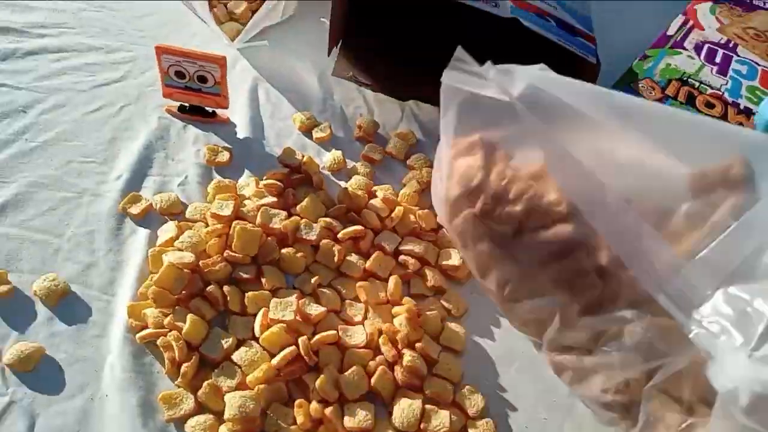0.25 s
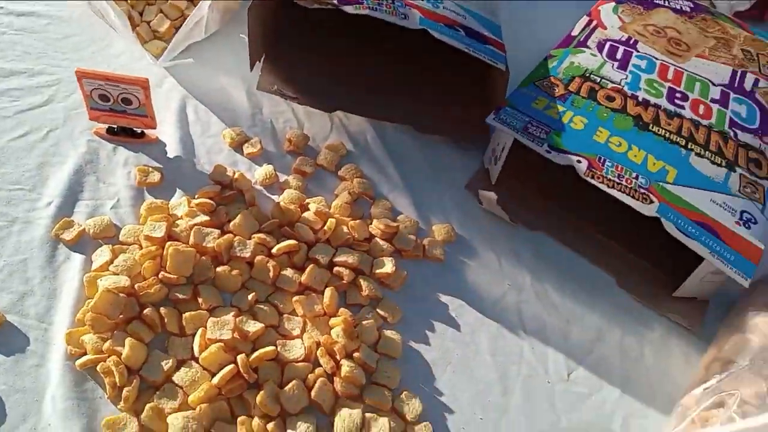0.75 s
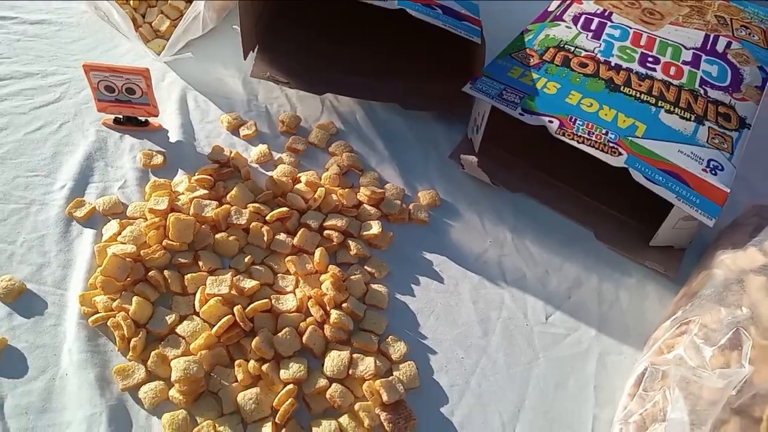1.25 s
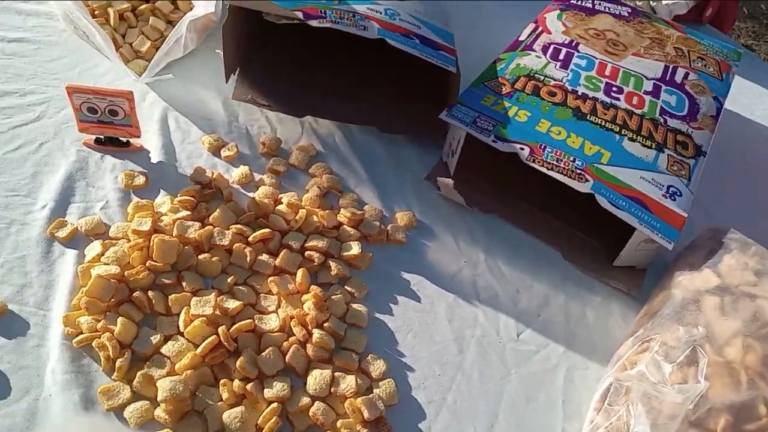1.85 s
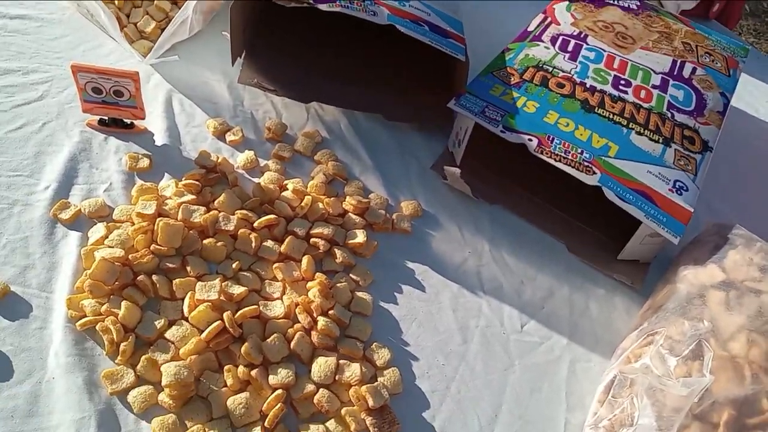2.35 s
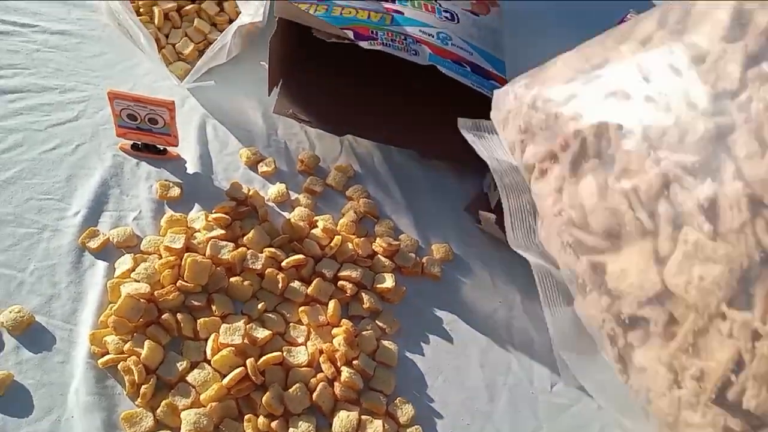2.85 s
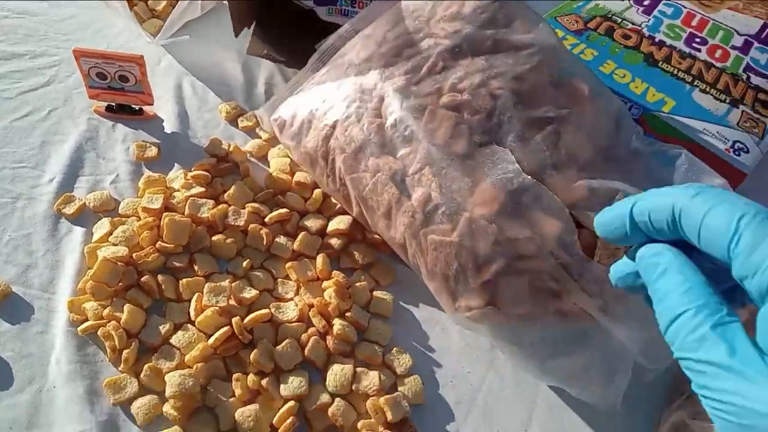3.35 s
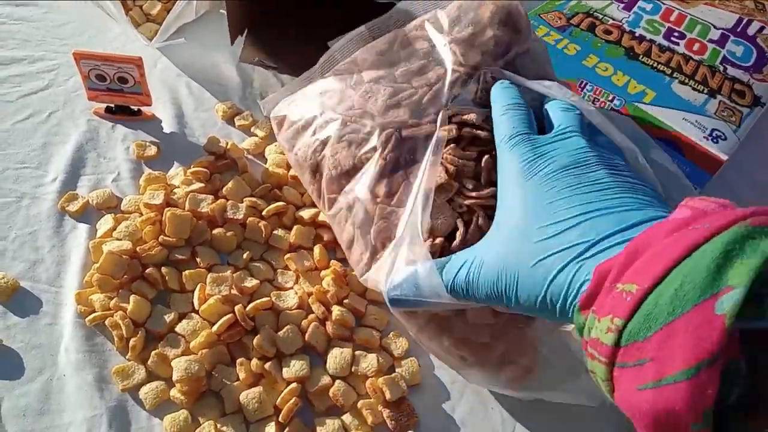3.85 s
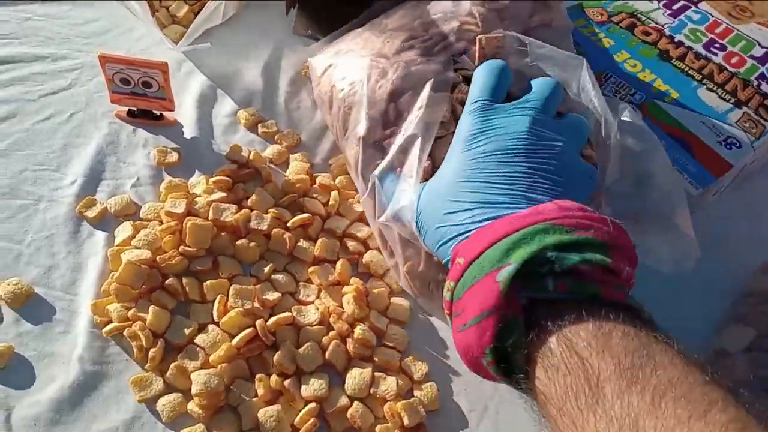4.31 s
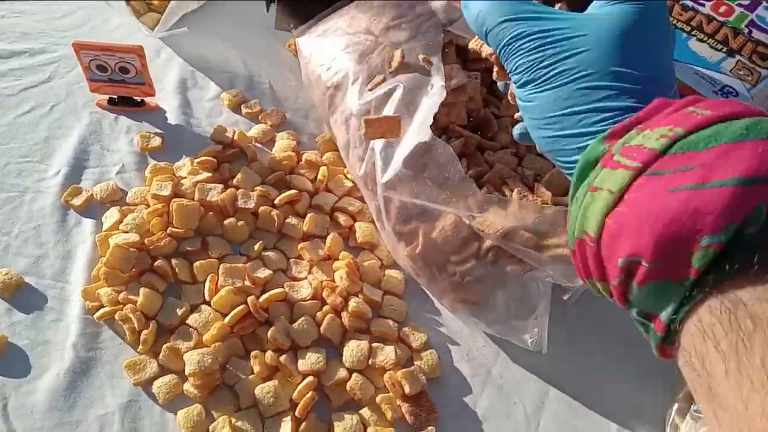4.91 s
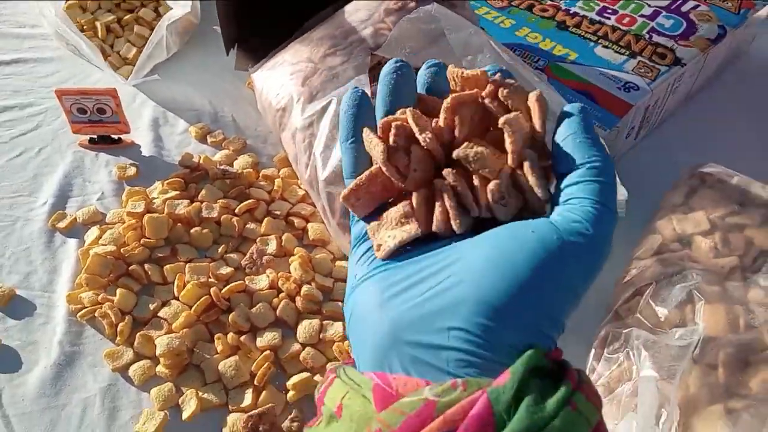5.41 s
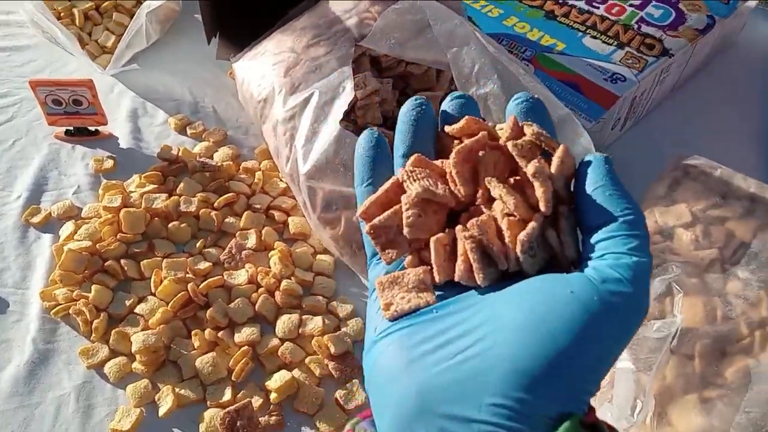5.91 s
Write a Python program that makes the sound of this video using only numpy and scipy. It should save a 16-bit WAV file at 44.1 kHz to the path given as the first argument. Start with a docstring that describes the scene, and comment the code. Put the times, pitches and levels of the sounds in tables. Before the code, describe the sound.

A stiff film bag is handled outdoors, right beside two differing microphones: strong crinkles, bright pops, soft thuds of settling cereal and a few low bumps. After a thick rustle as it lands, short scrapes and gritty rattling mark a hand digging inside. One quick cardboard knock sounds as the handful comes out, and the noise thins to isolated clicks over quiet air and faint far engine hum. No echo; mostly left-sided, with a brittle right side.

```python
"""Dry film crackle and snaps as a hand drags a plastic cereal bag past two unlike microphones, outdoors.
It digs in and lifts out dry squares: random grain bursts give film, ticks and lumps; timed bursts give snaps.
Filtered noise makes slumps and scrapes, pressure pulses the bumps on the microphones, decaying sines a knock
on the carton. Behind lie shaped air noise, a far engine's wavering sines and a faint high tone.
Left microphone: farther from the sound, loud in the mids. Right: thin and bright."""
import sys
import numpy as np
from scipy import signal
from scipy.fft import rfft, irfft
from scipy.io import wavfile
from scipy.ndimage import uniform_filter1d

SR = 44100
rng = np.random.default_rng(int(sys.argv[2]) if len(sys.argv) > 2 else 0)


def unload_wav(signal):
    """Save mono or channel-first audio to the path in sys.argv[1] as 16-bit WAV at rate SR, clipped to [-1, 1]."""
    wavfile.write(
        sys.argv[1],
        SR,
        np.round(np.clip(np.atleast_2d(signal).T, -1, 1) * 32767).astype(np.int16),
    )


N = 272008

# outdoor air spectrum before the microphones: f/Hz, relative density/dB
AIR_SPECTRUM = [(30, -4), (80, 5.5), (280, 3.5), (480, -35), (700, -6), (1300, -24), (2500, -26.5),
                (5000, -44), (16000, -19)]
# air RMS level: left/dB, right/dB
AIR_RMS_DB = [-56, -62.5]
# low hum, fundamental before the side gains: t/s, level/dB
HUM_LEVEL = [(0, -54), (.51, -54.5), (.62, -42), (.84, -54), (.98, -46.5), (1.2, -53), (1.6, -77),
             (2.0, -72), (2.15, -48), (2.37, -51), (2.7, -106), (3.18, -62), (3.54, -58), (3.76, -56.5),
             (4.28, -62), (4.41, -66), (5.21, -63), (5.27, -47), (5.5, -41), (5.62, -40.5), (5.77, -38),
             (5.9, -42), (6.17, -41)]
# hum overtones before the side gains: f/Hz, base level/dB
HUM_OVERTONES = [(156, -60), (233, -57.5), (335, -64)]
# short stretches of the faint high tone: start/s, end/s
THIN_TONE_STRETCHES = [(5.41, 5.5), (5.55, 5.66), (5.72, 5.82)]
# left microphone response: f/Hz, gain/dB
LEFT_COLOUR = [(40, -56), (90, -17.5), (300, -16.5), (700, -15), (1300, -8), (1900, 3.5), (2700, 3.5),
               (3600, 0), (4400, -5), (5200, -10), (6200, -8.5), (7600, -14), (8500, -13.5), (9300, -24),
               (11000, -43.5), (12500, -46), (15400, -33.5), (15800, -43), (16200, -93.5)]
# right microphone response: f/Hz, gain/dB
RIGHT_COLOUR = [(40, -14.5), (90, -19), (300, -12), (1000, -14), (2500, -8), (6000, -10.5), (7700, -13),
                (9200, -2), (10300, -11), (12000, -20.5), (13800, -25.5), (14600, -12.5), (15600, -9.5),
                (16000, -24.5), (16600, -38)]
# piece rocking on the carton: t/s, left peak/dB
CARTON_CONTACTS = [(5.129, -22), (5.132, -7), (5.1343, -10.5), (5.1363, -12.5), (5.146, -25), (5.1535, -22),
                   (5.1625, -34)]
# modes of the hollow carton: f/Hz, relative level/dB, t60/s
CARTON_MODES = [(805, -10, 0.047), (882, -2.5, 0.022), (1280, 1.5, 0.019), (1766, 5, 0.021),
                (2280, -1.5, 0.016), (3065, -1.5, 0.013)]
# bag scraping over cloth: start/s, length/s, left level before fades/dB, first f/Hz, last f/Hz
CLOTH_SCRAPES = [(2.814, 0.18, -29.5, 1420, 1140), (3.622, 0.15, -37.5, 1320, 940),
                 (4.064, 0.154, -37, 1210, 890), (4.654, 0.075, -31, 1760, 1280)]
# slumps of the full bag: t/s, mean peak of both sides/dB, ring f/Hz, t60/s, left minus right/dB
BAG_SLUMPS = [(0.649, -36, 254, 0.15, 4), (0.7, -27, 730, 0.032, -7), (0.742, -20, 671, 0.024, 0),
              (1.211, -25, 250, 0.037, -7.5), (1.246, -23, 254, 0.096, -6), (1.267, -15.5, 293, 0.033, 4.5),
              (1.32, -15, 523, 0.01, 10.5), (1.334, -23.5, 770, 0.046, -1), (1.449, -24.5, 623, 0.021, 10),
              (2.06, -25, 795, 0.12, -3), (3.026, -29, 890, 0.084, 15), (3.048, -29.5, 280, 0.012, 12)]
# bag bumping the microphones, before the roll-off: t/s, left push/1, right push/1, decay time/ms
MIC_BUMPS = [(0.3893, 0, 2.5, 0.62), (2.156, 0, 0.7, 1.8), (2.1984, 1.8, 0.7, 1.05),
             (2.208, 0.7, -1.5, 0.53), (2.2194, 0.94, 0.4, 1.5), (2.229, 0.16, 0.3, 1.5),
             (2.2915, -2.5, 0.5, 0.33), (2.2922, -0.3, 0.3, 1.8), (2.345, -1.4, -0.8, 0.19),
             (2.365, 0.2, 0.2, 1.5)]
# single snaps and ticks: t/s, left peak/dB, right peak/dB, ring f/Hz, t60/s, top-band sheen/dB
FOLD_SNAPS = [(0.1208, -8, -15, 3150, 0.0075, 2), (0.1883, -16, -11.5, 2820, 0.004, 9),
              (0.2346, -6, -15.5, 3560, 0.0081, 0), (0.296, -6, -13.5, 2650, 0.0084, 1),
              (0.3077, -5.0, -17.5, 2580, 0.0094, -12), (0.4123, -29, -16, 2930, 0.0061, 22),
              (0.494, -10, -8.5, 2570, 0.0039, 9), (0.535, -17, -8, 2630, 0.012, 33),
              (0.562, -12, -19, 2230, 0.02, -3), (0.5844, -5, -20, 2600, 0.0031, 22),
              (0.661, -13, -21, 2580, 0.0053, -2), (0.794, -12, -30, 3770, 0.012, -6),
              (0.8119, -14, -16, 2460, 0.014, 1), (0.842, -9, -23, 2620, 0.0057, -20),
              (0.859, -10.5, -26, 4130, 0.013, -5), (0.8768, -10, -28, 2180, 0.0026, -5),
              (0.8854, -14, -28, 1920, 0.0039, 5), (0.8932, -8.5, -21, 3060, 0.0045, 5),
              (0.9266, -7.5, -15.5, 2770, 0.025, -4), (0.9574, -11, -33, 2220, 0.012, 0),
              (0.9973, -8.5, -27, 2620, 0.0064, -1), (1.005, -11, -21, 2820, 0.007, -7),
              (1.03, -23, -13.5, 1970, 0.012, 3), (1.0593, -12.5, -23, 2690, 0.0078, 1),
              (1.071, -10.5, -26, 2700, 0.0088, -22), (1.083, -11.5, -17.5, 2700, 0.0098, -2),
              (1.154, -16.5, -16, 2520, 0.0051, 6), (1.174, -17, -22, 2150, 0.008, 2),
              (1.269, -10, -24, 2640, 0.0061, -10), (1.322, -13, -24, 2780, 0.025, 0),
              (1.339, -8.5, -13, 2220, 0.0055, 9), (1.512, -15, -22, 2700, 0.008, 6),
              (1.5347, -16, -27, 2820, 0.008, 11), (1.5568, -11, -21, 3300, 0.0047, 5),
              (1.5718, -21, -19, 2690, 0.01, 12), (1.5912, -11.5, -33, 2630, 0.018, -14),
              (1.613, -13, -32, 2930, 0.0041, -5), (1.621, -9.5, -22, 2600, 0.014, -13),
              (1.6415, -11, -29, 2150, 0.0045, -15), (1.6932, -9.5, -21, 3320, 0.0059, -10),
              (1.7111, -6.5, -25, 2600, 0.0063, -15), (1.7197, -13, -15.5, 1870, 0.0063, -11),
              (1.755, -24, -25, 1920, 0.0056, 5), (1.765, -10, -24, 3310, 0.0069, 14),
              (1.777, -14.5, -26, 2800, 0.0056, -4), (1.8208, -13, -21.5, 2560, 0.0025, 0),
              (1.8468, -15, -22, 2520, 0.0046, 4), (1.8795, -18.5, -36, 1900, 0.0054, -7),
              (1.9262, -10.5, -17.5, 2610, 0.0086, 15), (1.96, -26, -26, 2700, 0.0045, 17),
              (1.969, -32, -14, 2280, 0.0058, 6), (1.9982, -13, -14, 2680, 0.007, 5),
              (2.0307, -7, -9.5, 2740, 0.0053, 20), (2.077, -6.5, -10.5, 3000, 0.0055, 11),
              (2.1184, -10, -15.5, 3770, 0.02, -1), (2.1408, -26.0, -15, 2840, 0.0096, 15),
              (2.1573, -10, -13, 3030, 0.0098, 7), (2.1703, -22, -8.5, 3060, 0.0077, 21),
              (2.2, -3, -3, 3830, 0.012, 5), (2.221, -10, -6, 2800, 0.01, 7),
              (2.2687, -9, -14, 3300, 0.008, -6), (2.2914, -5.5, -5.5, 1400, 0.005, 14),
              (2.347, -8, -9.5, 2480, 0.01, 19), (2.387, -25, -11, 2600, 0.009, 18),
              (2.423, -16, -32, 1960, 0.0063, -14), (2.464, -14, -19, 2220, 0.0098, 7),
              (2.4825, -12, -20.5, 3320, 0.0082, 1), (2.5366, -18, -21, 2910, 0.0073, 2),
              (2.557, -29, -21, 2330, 0.01, 16), (2.5799, -11, -29, 2800, 0.0094, -1),
              (2.5893, -16.0, -17.5, 1710, 0.0091, 3), (2.6174, -7, -18.5, 2720, 0.021, 0),
              (2.6727, -14, -18.5, 2820, 0.011, 4), (2.711, -16, -22, 2780, 0.0051, 7),
              (2.802, -32, -19, 3660, 0.0044, 22), (2.8215, -19, -20, 3100, 0.0079, 8),
              (2.8505, -7.5, -19, 2220, 0.0047, 3), (2.8693, -11, -21, 2680, 0.0054, 7),
              (2.892, -11, -22, 2280, 0.011, -2), (2.9813, -16, -16, 3250, 0.039, 14),
              (3.452, -13.5, -26, 2730, 0.0072, 12.5), (3.5618, -15.5, -30, 2890, 0.0044, 9),
              (3.576, -11, -24, 3800, 0.0026, 17), (3.5886, -16, -24, 4330, 0.023, 14),
              (3.627, -7.5, -15, 2970, 0.016, 19), (3.6387, -9, -20, 3700, 0.0075, 6),
              (3.71, -7.5, -19, 3620, 0.019, 19), (3.7382, -9, -25, 2000, 0.0033, 14),
              (3.7755, -9, -25, 3300, 0.0051, -3), (3.7873, -9, -20, 2540, 0.023, 12),
              (3.816, -9.5, -28, 2450, 0.0022, 2), (3.8855, -15, -24, 2430, 0.0124, 15),
              (3.907, -15, -25, 2970, 0.0022, 13), (3.9488, -9, -36, 3980, 0.012, -1),
              (3.9776, -10.5, -40, 3960, 0.018, 14), (4.0657, -10, -25, 3600, 0.0098, -1),
              (4.2417, -13.5, -27, 2480, 0.0088, 5), (4.271, -12.5, -29, 2370, 0.015, 0),
              (4.3038, -8, -22, 2650, 0.011, 2), (4.389, -19, -34, 3060, 0.007, 0),
              (4.4091, -10.5, -37, 4350, 0.039, -6), (4.559, -16, -26.5, 2970, 0.02, 3),
              (4.5835, -33, -22, 3790, 0.004, 24), (4.668, -12, -28, 3670, 0.011, 3),
              (4.6846, -11, -26.5, 3740, 0.0062, -4), (4.7042, -9.5, -20, 1480, 0.01, 0),
              (4.8355, -25, -38, 2920, 0.0066, -3), (4.8847, -46, -27, 2460, 0.0077, 22),
              (4.924, -20.5, -33, 2330, 0.025, 14), (4.963, -12.5, -27, 4200, 0.002, 13),
              (4.979, -20, -30.0, 3600, 0.0071, 21), (5.0002, -17.5, -37, 3650, 0.0073, 16),
              (5.0732, -21, -31, 3700, 0.003, 7), (5.1192, -24.5, -42, 3900, 0.0086, 8),
              (5.21, -16.5, -42, 3430, 0.0059, -4), (5.247, -17.5, -44, 2830, 0.0037, -18),
              (5.2547, -19, -45, 1880, 0.0022, -12), (5.2724, -25, -43, 2080, 0.0052, -8),
              (5.314, -16.5, -31, 3930, 0.0084, 17), (5.3186, -16, -34, 4100, 0.0034, 15),
              (5.3232, -9.5, -38, 3970, 0.0033, 17), (5.3298, -17, -34, 4100, 0.003, 17),
              (5.406, -29, -39, 3330, 0.0057, 8), (5.5062, -19, -39, 4330, 0.075, 0),
              (5.5251, -22, -33, 2900, 0.0035, 1), (5.6672, -6.5, -31, 3490, 0.002, 7.5),
              (5.671, -12, -34, 2350, 0.0024, -6), (5.6887, -18.5, -44, 2130, 0.0016, -9),
              (5.7323, -29.5, -59, 2150, 0.0019, -9), (5.761, -32.5, -60, 2390, 0.0059, -19),
              (5.8363, -9.5, -25, 4000, 0.0024, 11), (5.84, -17, -33, 1700, 0.0051, 16),
              (5.8897, -36, -36, 3350, 0.011, 23), (6.0302, -36, -66, 3060, 0.0086, -16),
              (6.082, -35, -48, 1860, 0.019, -2)]
# effort of the hand as base crackle level on the left: t/s, level/dB
HAND_EFFORT = [(0, -21.5), (.035, -16.5), (.073, -31), (.1, -18), (.122, -21.5), (.144, -15), (.18, -23),
               (.378, -20.5), (.394, -31.5), (.455, -32), (.472, -22.5), (.488, -29.5), (.599, -32),
               (.725, -20.5), (.789, -29.5), (.878, -28), (.913, -36), (.999, -23.5), (1.078, -30.5),
               (1.304, -32.5), (1.335, -19.5), (1.367, -28), (1.442, -21.5), (1.586, -31), (1.706, -29),
               (1.766, -42), (1.882, -34.5), (2.054, -18.5), (2.146, -41), (2.214, -17), (2.322, -33.5),
               (2.36, -24), (2.464, -28), (2.504, -37.5), (2.609, -31), (2.654, -38), (2.809, -32),
               (2.9, -25), (2.975, -21), (3.003, -25.5), (3.008, -14), (3.07, -17), (3.167, -18.5),
               (3.185, -24.5), (3.239, -25.5), (3.258, -32.5), (3.352, -46), (3.462, -36), (3.517, -41.5),
               (3.61, -26), (3.633, -20.5), (3.654, -27), (3.668, -21), (3.692, -26.5), (3.72, -24),
               (3.83, -28), (3.96, -25), (4.041, -26.5), (4.11, -24), (4.151, -24), (4.225, -31.5),
               (4.305, -26.5), (4.33, -34), (4.43, -28.5), (4.47, -32), (4.556, -23.5), (4.595, -35.5),
               (4.694, -27), (4.75, -36.5), (4.83, -38), (4.9, -43), (4.965, -38), (5.06, -39.5),
               (5.11, -51), (5.19, -39.5), (5.235, -55), (5.26, -46.5), (5.3, -49.5), (5.43, -56),
               (5.602, -63), (6.101, -63), (6.166, -53)]
# moving bag: t/s, right share/dB, cereal re crackle/dB, film sheen re crackle/dB, thud level/dB
BAG_MOTION = [(0, -21, -12, -12, -89), (.37, -9.5, -13.5, -10, -78), (.45, 3, -16, -6.5, -67),
              (.62, -2.5, -13, -7, -48), (.9, -0.5, -3.5, -10, -54), (1.05, -12.5, -15.5, -10, -61),
              (1.3, -3.5, -13.5, -7.5, -32), (1.44, -6.5, -9, -9.5, -40), (1.7, 0, -13, -9, -55),
              (1.86, -5.5, -6, -6, -60), (2.1, -6.5, -17, -4.5, -44.5), (2.36, -8, -15, -8.5, -56),
              (2.48, -13, -16.5, -10.5, -57), (2.65, -13, -19.5, -13.5, -57), (2.9, -12, -25, -12.5, -70),
              (3.0, -8, -32, -12.5, -66), (3.011, -17, -6.5, -22.5, -34.5), (3.12, -20, -7, -13.5, -39.5),
              (3.24, -17.5, -9, -11.5, -40), (3.28, -12, -18, -13.5, -50.5), (3.4, -9, -16, -8.5, -58),
              (3.55, -27, -11.5, -4.5, -61), (3.8, -34, -5, -11.5, -40.5), (4.04, -43, -7.5, -3.5, -50),
              (4.15, -18, -4.5, -15, -49), (4.25, -11, -14.5, -7, -54), (4.42, -23, -7.5, -7.5, -46.5),
              (4.55, -19, -19, -5, -57), (4.7, -16, -14.5, -8, -65), (4.95, -18, -15.5, -5, -62),
              (5.16, -11, -22, -4.5, -62), (5.3, -13, -22, -6.5, -71), (5.6, -22.5, 0, -10, -62.5),
              (6.17, -9, -5, -4.5, -57.5)]

ENGINE_HZ, THIN_TONE_HZ, THIN_TONE_DB = 76.8, 8400, -65  # tone level before the side gains
KNOCK_RIGHT_DB = -16.5  # re left
SCRAPE_POLE_WIDTH_HZ, SCRAPE_RIGHT_DB, SCRAPE_ROUGH_DB = 310, -27, 4
BUMP_LAG_S = 0.0017  # left capsule feels it later
BUMP_RISE = 0.45  # re decay time
CAPSULE_HZ, CAPSULE_Q = 97, 1.04  # bass roll-off, slight overshoot
HARD_DB, SHEEN_PER_DB = -19, 2.43  # effort above HARD_DB brightens the film
TILT_DB, TILT_PER_DB = -4, 1.33  # sheen tilts the mids to tight folds
TILT_PER_SIDE_DB = -0.41  # tight folds carry better to the side where the bag lies
RIGHT_THUD_DB, RIGHT_CEREAL_DB = -11.5, -2
RIGHT_SHEEN_DB, RIGHT_SHEEN_PER_DB = 1, 0.32  # right treble follows the bag's place only a little
LEFT_TOP_DB, RIGHT_TOP_DB = -22, -7  # finest crackle re sheen
TOP_PER_SIDE_DB = 0.46  # it fades as the bag leaves the right side
COLOUR_DRIFT_DB, COLOUR_HZ, COLOUR_S = 2.5, 350, 0.048  # drift RMS, patch width, patch length
RING_CYCLES = 60  # extra ring decay: 1/e in this many cycles
LEFT_LAG_SAMPLES, BAND_LIMIT_HZ = 52, 16900


def amp(db):
    """Amplitude factor of a dB level."""
    return 10 ** (np.asarray(db) / 20)


def evened(x):
    """Scales to RMS 1 over all channels."""
    return x / np.sqrt(np.mean(x ** 2) + 1e-20)


def read(points, hz):
    """Reads a spectrum table on a log frequency axis."""
    f, value = np.transpose(points)
    return np.interp(np.log(hz + 1), np.log(f + 1), value)


def along(curve, s):
    """Reads every column of a time table at s."""
    times, *columns = np.transpose(curve)
    return [np.interp(s, times, c) for c in columns]


def add(mix, s, sound):
    """Adds a sound in place at s, cut at the end of the mix."""
    part = mix[..., round(s * SR):][..., :sound.shape[-1]]
    part += sound[..., :part.shape[-1]]


def causal(db):
    """Minimum-phase impulse response of a dB curve on 1025 bins."""
    log_gain = np.log(amp(np.maximum(db, -100)))
    mirrored = np.r_[log_gain, log_gain[-2:0:-1]]
    return irfft(np.exp(np.conj(signal.hilbert(mirrored)))[:1025])


def wander(per_s):
    """Slow random drift, RMS 1: noise smoothed twice over 1/per_s."""
    size = max(2, int(SR / per_s))
    smooth = uniform_filter1d(rng.standard_normal(N), size)
    return evened(uniform_filter1d(smooth, size))


def shares(hz, edges_hz=(380, 1250, 2700, 5200, 10800)):
    """Power shares of six bands, lowest first."""
    below = [1 / (1 + (hz / edge_hz) ** 10) for edge_hz in edges_hz]
    below = [0 * hz] + below + [1 + 0 * hz]
    return np.diff(below, axis=0).clip(1e-9)


def burst(noise, hz, t60, ring, alike, rise_s):
    """A buckling fold: dying noise puff plus short ring; each microphone hears its own mix."""
    t = np.arange(1, noise.shape[1] + 1) / SR
    alike = np.clip(alike, 0, 1)
    puff = np.array([noise[0], alike * noise[0] + np.sqrt(1 - alike ** 2) * noise[1]])
    tone = ring * np.sin(2 * np.pi * hz * t + noise[0, 0]) * np.exp(-t * hz / RING_CYCLES)
    tone = tone * [[1], [.55]]  # the ring reaches the right side less
    decay = amp(-60 * t / np.clip(t60, .001, .3))
    return (puff + tone) * decay * (1 - np.exp(-(t / rise_s) ** 2))


def grains(pace, per_s, spread_db, low_hz, t60, ring, hiss, rise_s):
    """Small random bursts, as dense as the pace of the hand, over a bed too dense to resolve."""
    size = amp(spread_db * np.minimum(rng.exponential(1, N), 4))
    size *= rng.random(N) < per_s * pace / SR
    kind, out = rng.integers(0, 24, N), np.zeros((2, N))
    for k, (pitch, length) in enumerate(rng.random((24, 2))):
        fold = burst(rng.standard_normal((2, 900)), low_hz * 3.5 ** pitch, t60 * 8.0 ** length,
                     ring, alike=0.023, rise_s=rise_s)
        out += signal.oaconvolve((size * (kind == k))[None], fold, axes=1)[:, :N]
    bed = evened(np.sqrt(pace) * rng.standard_normal((2, N)))
    return evened(out) + hiss * bed


def coloured(x):
    """Random patches in pitch and time raise and lower the crackle's level."""
    z = signal.stft(x, nperseg=512, noverlap=384)[2]
    patches = rng.standard_normal(z.shape[1:])
    for axis, size in enumerate((COLOUR_HZ * 512 / SR, COLOUR_S * SR / 128)):
        patches = uniform_filter1d(patches, max(2, round(size)), axis=axis)
    drift = amp(COLOUR_DRIFT_DB * evened(patches))
    return signal.istft(z * drift, nperseg=512, noverlap=384)[1][:, :N]


def outdoor_air():
    """Broadband air noise, shaped by its spectrum and each microphone."""
    hz = np.fft.rfftfreq(N, 1 / SR)
    colours_db = read(AIR_SPECTRUM, hz) + [read(LEFT_COLOUR, hz), read(RIGHT_COLOUR, hz)]
    air = irfft(rfft(rng.standard_normal((2, N))) * amp(colours_db), N)
    return np.array([amp(db) * evened(side) for db, side in zip(AIR_RMS_DB, air)])


def wavering_tone(level_db, hz):
    """Sine of time-varying level and frequency."""
    return amp(level_db) * np.sin(2 * np.pi * np.cumsum(hz) / SR)


def far_engine():
    """Low engine hum: fundamental and overtones, each wavering in pitch and level."""
    hum_level_db, = along(HUM_LEVEL, np.arange(N) / SR)
    hum = wavering_tone(hum_level_db + 1.1 * wander(5.1) + wander(30), ENGINE_HZ + 0.661 * wander(3.06))
    for f, db in HUM_OVERTONES:
        level_db = db + 0.051 * (hum_level_db + 48) + 3.6 * wander(11)
        hum += wavering_tone(level_db, f + 1.46 * wander(4.6))
    return hum * amp([[2.2], [-8.0]])


def thin_tone():
    """A faint high sine of steady pitch and fluttering level, heard in three short stretches."""
    t = np.arange(N) / SR
    gate = uniform_filter1d(sum(1. * (t > a) * (t < b) for a, b in THIN_TONE_STRETCHES), 300)
    tone = amp(THIN_TONE_DB + 2.4 * wander(62)) * gate * np.sin(2 * np.pi * THIN_TONE_HZ * t)
    return tone * amp([[-1.5], [-14.0]])


def knock():
    """Each contact strikes the carton's few modes at a new spot, so their balance varies."""
    t, out = np.arange(3000) / SR, np.zeros((2, N))
    spots = rng.standard_normal((len(CARTON_CONTACTS), len(CARTON_MODES)))
    for (s, level_db), spot in zip(CARTON_CONTACTS, spots):
        ring = np.zeros(len(t))
        for (hz, db, t60), offset in zip(CARTON_MODES, spot):
            decay_db = -60 * t / np.clip(t60, .005, .09)
            ring += amp(db + 3.4 * offset + decay_db) * np.sin(2 * np.pi * hz * t)
        ring *= 1 - np.exp(-t / 0.0015)
        add(out, s, ring / abs(ring).max() * amp([[level_db], [level_db + KNOCK_RIGHT_DB]]))
    return out


def scrapes():
    """Stuttering friction rings a pocket of the bag whose pitch sinks as the pocket opens."""
    out, r = np.zeros((2, N)), np.exp(-np.pi * SCRAPE_POLE_WIDTH_HZ / SR)
    for s, length, db, from_hz, to_hz in CLOTH_SCRAPES:
        u = np.arange(0, 1, 1 / (length * SR))
        glide_hz = from_hz * (to_hz / from_hz) ** u
        turn = np.exp(2j * np.pi * np.cumsum(glide_hz) / SR)
        rub, other, stutter = rng.standard_normal((3, 12000))[:, :len(u)]
        rough = amp(SCRAPE_ROUGH_DB * evened(uniform_filter1d(stutter, 200)))
        rub = np.array([rub, 0.3 * rub + 0.73 * other]) * rough
        # shift to 0 Hz, low-pass, shift back: a gliding resonance
        rung = (turn * signal.lfilter([1], np.convolve([1, -r], [1, -r]), rub / turn)).real
        fades = u ** 0.5 * np.minimum(12 * (1 - u), 1)
        add(out, s, evened(rung) * fades * amp([[db], [db + SCRAPE_RIGHT_DB]]))
    return out


def slumps():
    """The mass of cereal settles with a dull, short ring."""
    out = np.zeros((2, N))
    noises = rng.standard_normal((len(BAG_SLUMPS), 2, 4000))
    for (s, db, hz, t60, side_db), noise in zip(BAG_SLUMPS, noises):
        fall = burst(noise, hz, t60, ring=0.7, alike=0.26, rise_s=0.0023)
        dull = signal.lfilter(*signal.butter(2, [hz * 0.56, hz * 0.96], "band", fs=SR), fall)
        gains = amp(db + np.array([[side_db / 2], [-side_db / 2]]))
        add(out, s, gains * dull / abs(dull).max(1)[:, None])
    return out


def bumps():
    """A short push of pressure on the capsules, which swing back through their bass roll-off."""
    t_ms, out = np.arange(900) / SR * 1000, np.zeros((2, N))
    for s, left, right, decay_ms in MIC_BUMPS:
        push = (1 - np.exp(-t_ms / (BUMP_RISE * decay_ms))) * np.exp(-t_ms / decay_ms)
        add(out[0], s + BUMP_LAG_S, left * push)
        add(out[1], s, right * push)
    w = 2 * np.pi * CAPSULE_HZ
    return signal.lfilter(*signal.bilinear([1, 0, 0], [1, w / CAPSULE_Q, w ** 2], SR), out)


def settling_crumbs(noise, ring_hz):
    """Uneven dying noise and scattered re-contacts, duller than the crack."""
    crumbs = burst(noise[2:4], ring_hz, 0.062, ring=0, alike=.2, rise_s=0.002)
    crumbs *= amp(4.4 * evened(uniform_filter1d(noise[5], size=50)))
    decay = amp(-60 * np.arange(3000) / SR / 0.05)
    contacts = noise[5] * (abs(noise[4]) > 2.45) * decay  # pieces touch again
    tick = burst(noise[2:4, :400], ring_hz, 0.003, ring=1.0, alike=.1, rise_s=.0001)
    crumbs += amp(6.0) * signal.fftconvolve(contacts[None], tick, axes=1)[:, :3000]
    return amp(-16.5) * signal.lfilter(*signal.butter(2, 4500, fs=SR), crumbs)


def soft_onset(noise, ring_hz, crackle_db):
    """A short dull noise rise leads into each crack, weaker when the crackle is quiet."""
    rise = burst(noise, ring_hz, 0.023, ring=0, alike=.2, rise_s=.0001)[:, ::-1]
    return amp(-14 + 0.45 * min(crackle_db + 32, 0)) * uniform_filter1d(rise, size=3)


def snaps():
    """Folds and ticks that stand out: soft onset, crack with its own ring and brightness, then crumbs."""
    hz, out, lead = np.fft.rfftfreq(2048, 1 / SR), np.zeros((2, N)), 400  # onset samples
    noises = rng.standard_normal((len(FOLD_SNAPS), 6, 3000))
    for (s, left_db, right_db, ring_hz, t60, sheen_db), noise in zip(FOLD_SNAPS, noises):
        crack = burst(noise[:2], ring_hz, t60, ring=1.14, alike=0.036, rise_s=0.00018)
        onset = soft_onset(noise[4:, :lead], ring_hz, along(HAND_EFFORT, s)[0])
        fold = np.c_[onset, crack + settling_crumbs(noise, ring_hz)]
        top_db = sheen_db + TOP_PER_SIDE_DB * (along(BAG_MOTION, s)[0] + 8)
        bands_db = np.array([-25.0, -12.0, 0, 0, sheen_db, top_db])
        tilt_db = 10 * np.log10(10 ** (bands_db / 10) @ shares(hz))
        for ear, (colour, db) in enumerate(((LEFT_COLOUR, left_db), (RIGHT_COLOUR, right_db))):
            heard = signal.fftconvolve(fold[ear], causal(read(colour, hz) + tilt_db))
            add(out[ear], s - lead / SR, amp(db) / abs(heard).max() * heard)
    return out


def crackle_sources(left_db):
    """Stick and slip of the hand paces film, pops, ticks and lumps, mixed into six band sources."""
    effort = amp(.7 * np.clip(left_db + 27, -4, 12))  # hard handling packs grains into a smooth rush
    slips_db = (2.6 * wander(45) + 3.0 * wander(150)) / effort ** 0.87
    pace = effort * amp(slips_db)
    film_pace = effort * amp(0.56 * slips_db + 3.3 * wander(18) + 3.5 * wander(110))
    film = grains(film_pace, 380, spread_db=2.5, low_hz=3830, t60=0.0022, ring=0.75, hiss=0.47,
                  rise_s=0.00055)
    pops = grains(pace, 130, spread_db=2.0, low_hz=1784, t60=0.0008, ring=0.58, hiss=0, rise_s=0.00011)
    ticks = grains(pace, 700, spread_db=3.0, low_hz=1400.0, t60=0.0076, ring=0.69, hiss=0.26,
                   rise_s=0.00029)
    lumps = grains(pace, 300, spread_db=4.0, low_hz=500.0, t60=0.048, ring=0.6, hiss=0.62, rise_s=0.0013)
    sources = [lumps,
               lumps + 0.41 * ticks + .3 * pops,
               ticks + 0.74 * pops,
               ticks + 0.88 * film + 0.7 * pops,
               film + 0.66 * pops,
               film + 2.5 * pops]
    return np.array(sources) / np.sqrt(effort)


def crackle():
    """Film crackle with sharp pops rules the treble, ringing cereal ticks the mids, lumps the lows."""
    t = np.arange(N) / SR
    left_db, = along(HAND_EFFORT, t)
    side_db, cereal_db, film_db, thud_db = along(BAG_MOTION, t)
    film_db = film_db + SHEEN_PER_DB * np.maximum(left_db - HARD_DB, 0)
    tilt_db = TILT_DB + TILT_PER_DB * (film_db + 20.0) + TILT_PER_SIDE_DB * (side_db + 16.5)
    tilt_db = np.clip(tilt_db, -6, 9)
    cereal_db, sheen_db, right_db = left_db + cereal_db, left_db + film_db, left_db + side_db
    right_sheen_db = sheen_db + RIGHT_SHEEN_DB + RIGHT_SHEEN_PER_DB * side_db
    left_levels_db = (thud_db,
                      cereal_db,
                      left_db + 2.5 - tilt_db / 2,
                      left_db - 4.0 + tilt_db / 2,
                      sheen_db,
                      sheen_db + LEFT_TOP_DB)
    right_levels_db = (thud_db + RIGHT_THUD_DB,
                       0.67 * cereal_db + 0.5 * right_db + RIGHT_CEREAL_DB,
                       right_db - 6.0 - 0.45 * tilt_db,
                       right_db - 8.0 + 0.12 * tilt_db,
                       right_sheen_db,
                       right_sheen_db + RIGHT_TOP_DB + TOP_PER_SIDE_DB * side_db)
    sources = crackle_sources(left_db)
    hz, out = np.fft.rfftfreq(2048, 1 / SR), np.zeros((2, N))
    ears = ((LEFT_COLOUR, left_levels_db), (RIGHT_COLOUR, right_levels_db))
    for ear, (colour, levels_db) in enumerate(ears):
        for source, share, db in zip(sources, shares(hz), levels_db):
            response = causal(read(colour, hz) + 10 * np.log10(share))
            band = signal.oaconvolve(source[ear], response)[:N]
            out[ear] += amp(db) * evened(band)
    return coloured(out)


def scene():
    """Sums the sources; airborne sound reaches the right microphone first."""
    heard = outdoor_air() + far_engine() + thin_tone()
    heard = heard + knock() + scrapes() + slumps() + snaps() + crackle()
    heard[1] = np.roll(heard[1], -LEFT_LAG_SAMPLES)
    return heard + bumps()


def record(dry):
    """Full-scale clipping, then the band limit."""
    low_pass = signal.firwin(511, BAND_LIMIT_HZ, window=("kaiser", 9), fs=SR)
    return signal.oaconvolve(dry.clip(-1, 1), low_pass[None], "same")


dry = scene()
out = record(dry)
unload_wav(out)
```